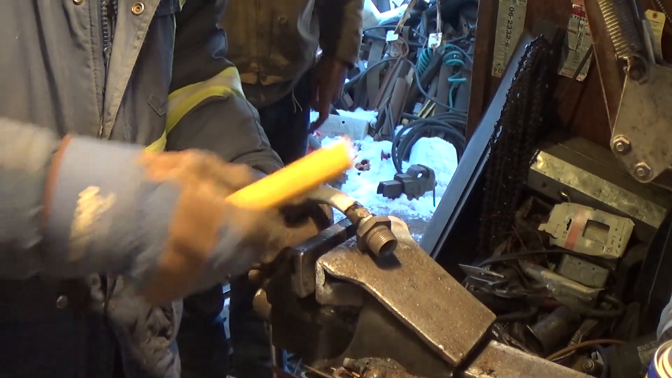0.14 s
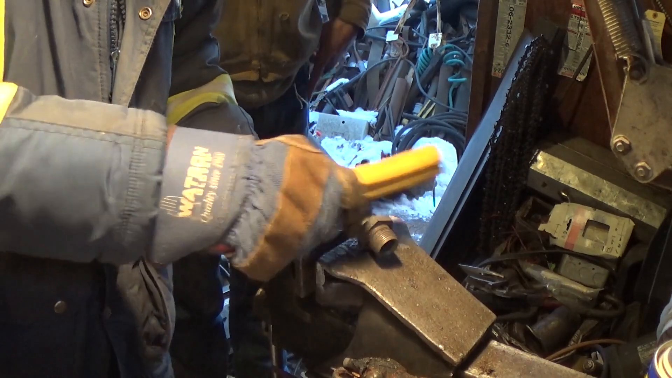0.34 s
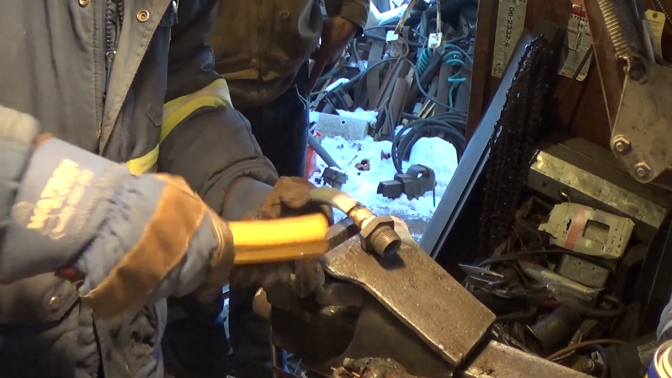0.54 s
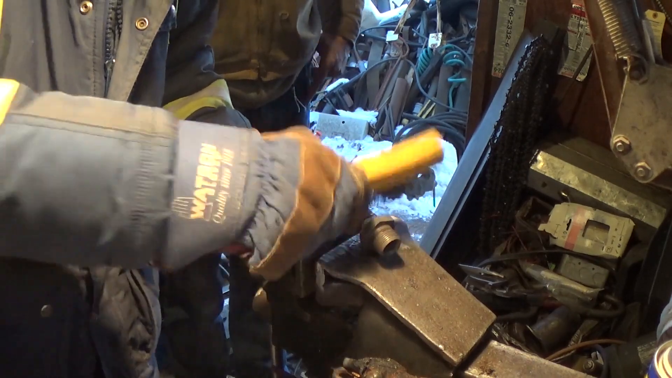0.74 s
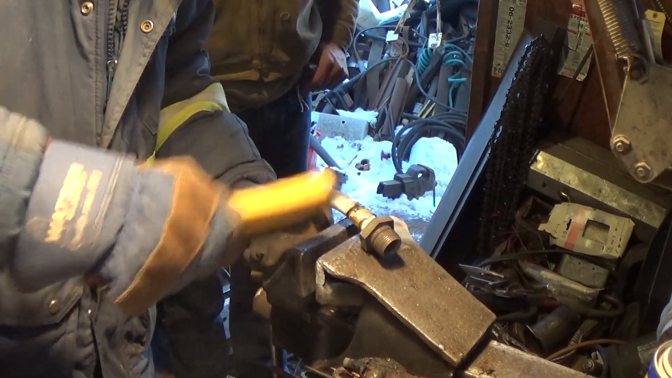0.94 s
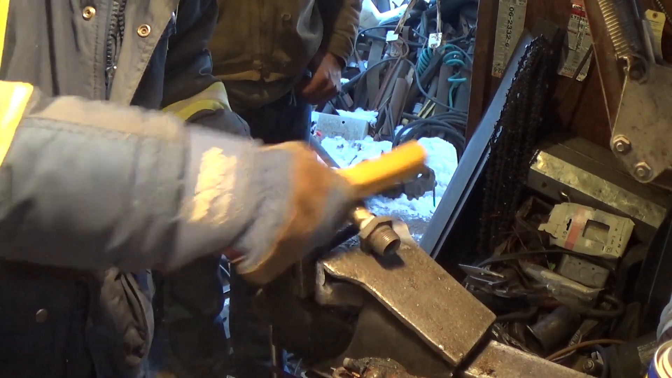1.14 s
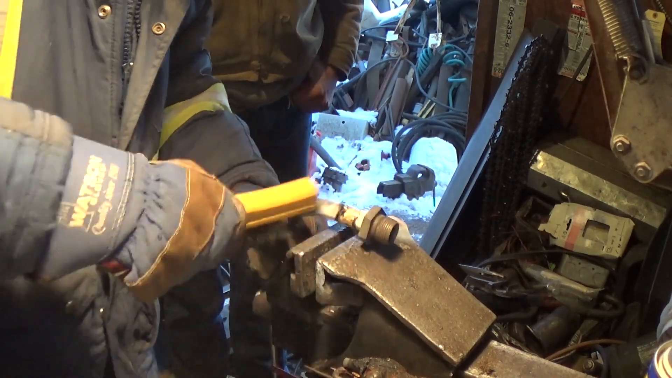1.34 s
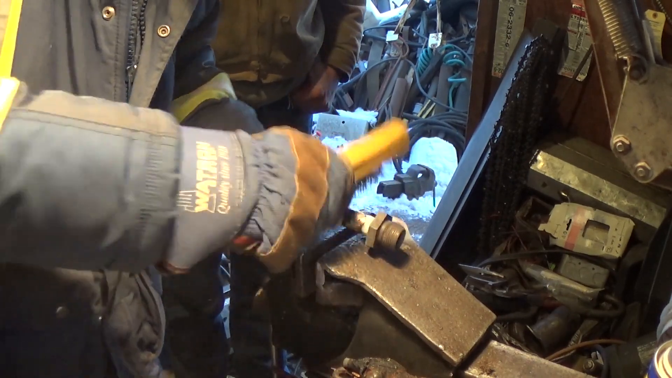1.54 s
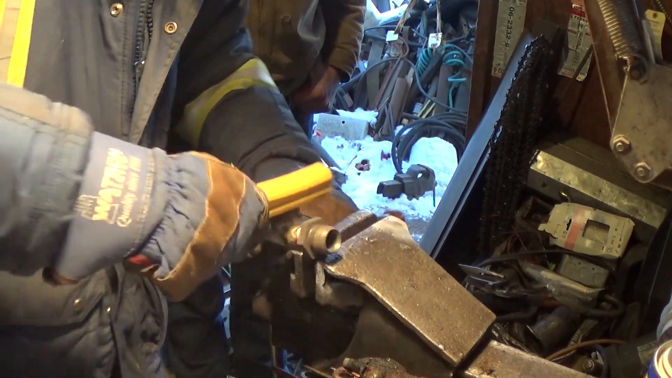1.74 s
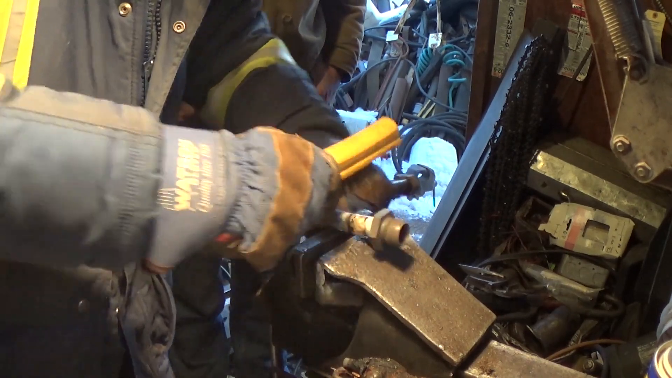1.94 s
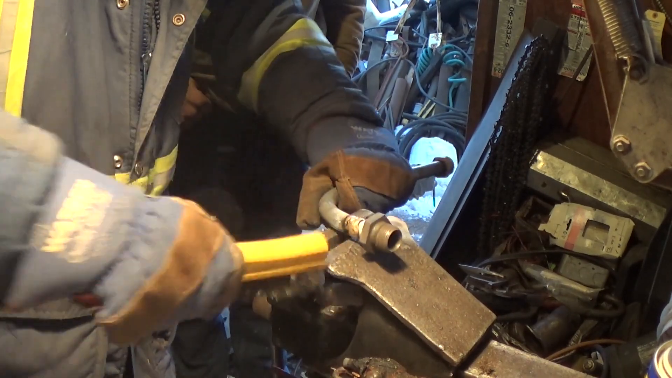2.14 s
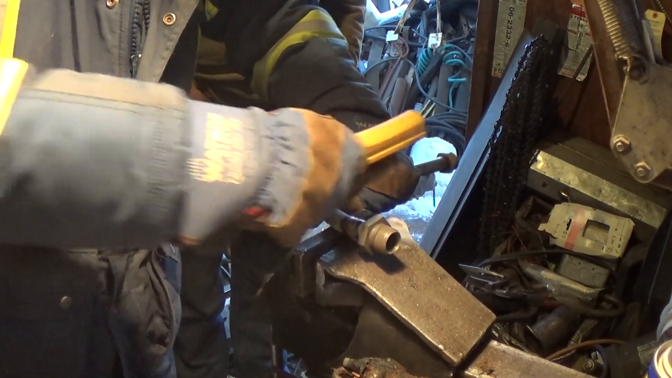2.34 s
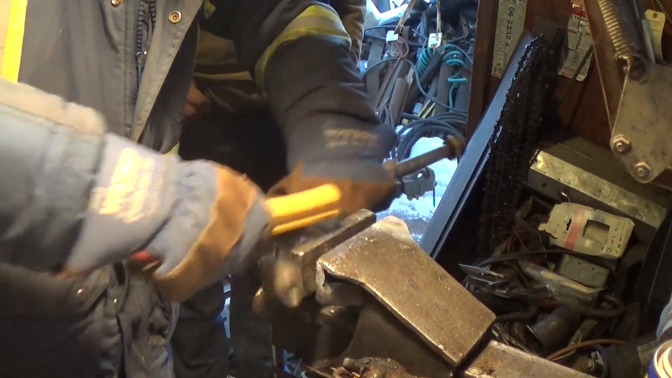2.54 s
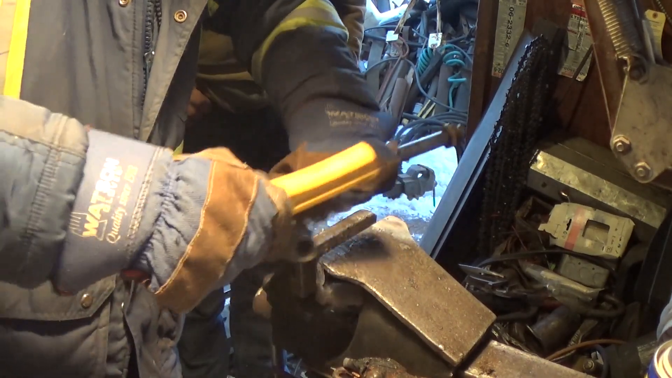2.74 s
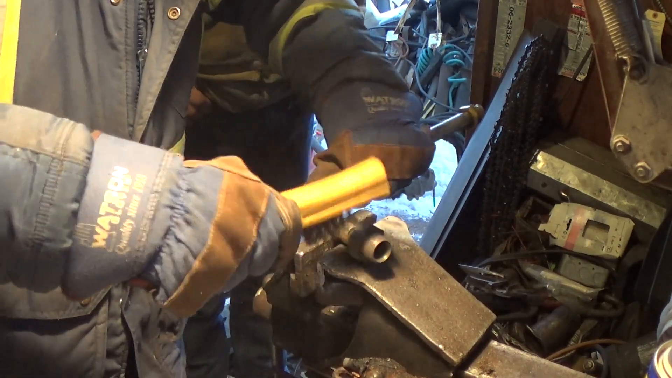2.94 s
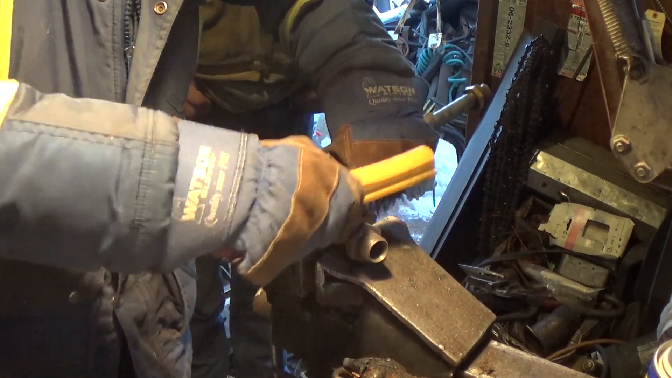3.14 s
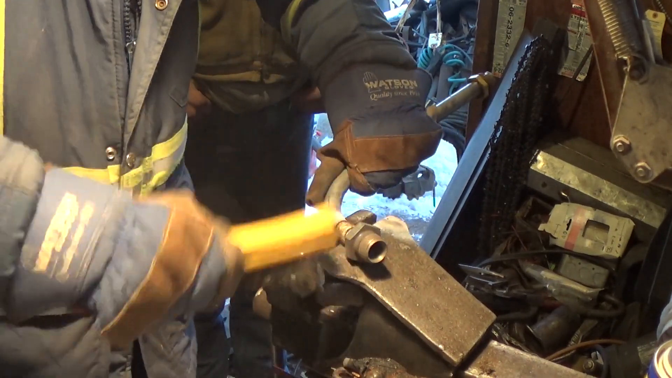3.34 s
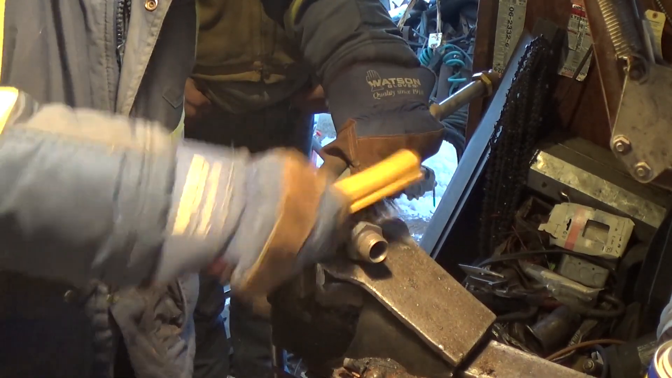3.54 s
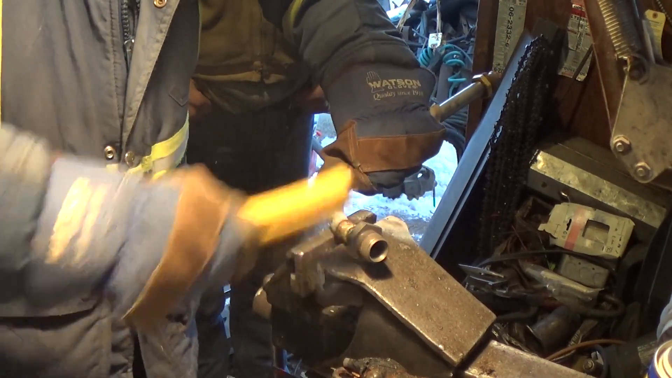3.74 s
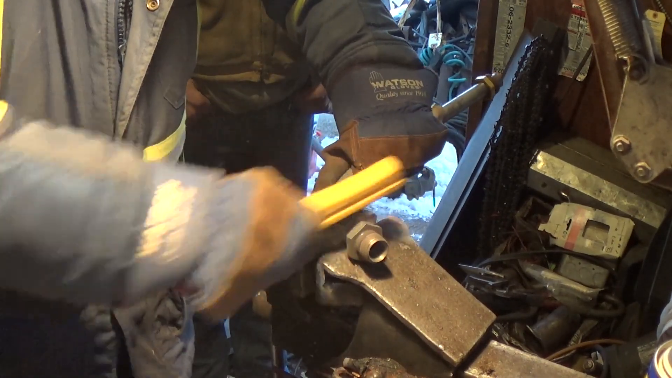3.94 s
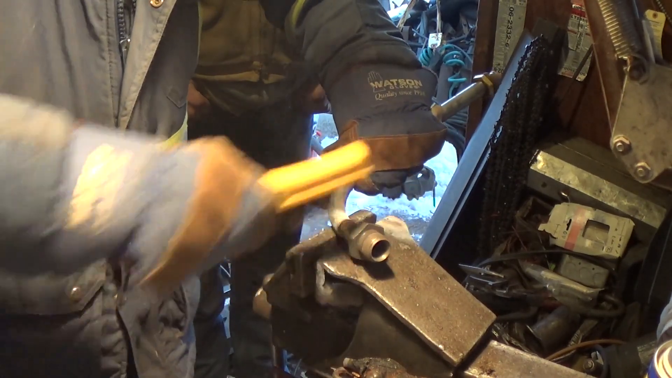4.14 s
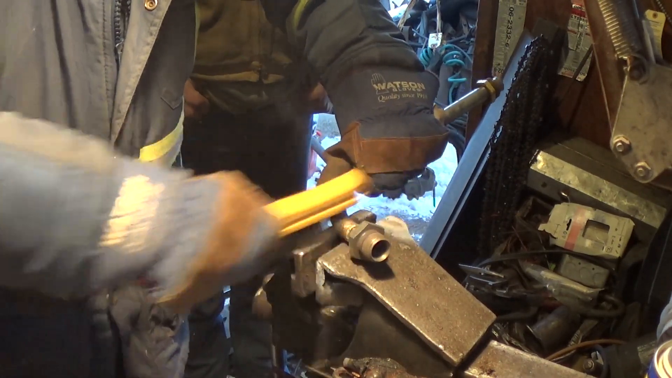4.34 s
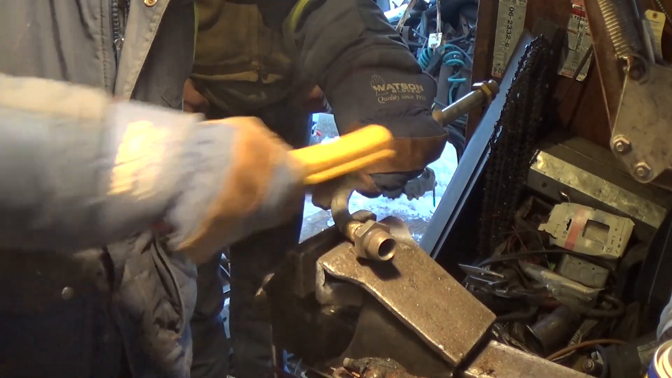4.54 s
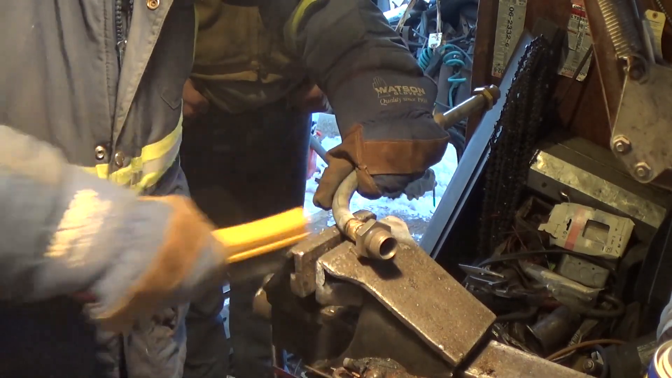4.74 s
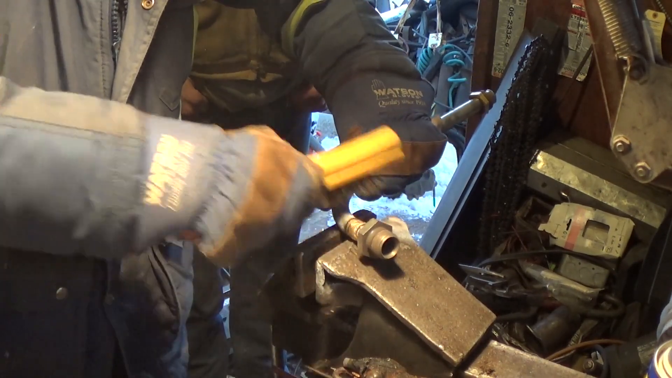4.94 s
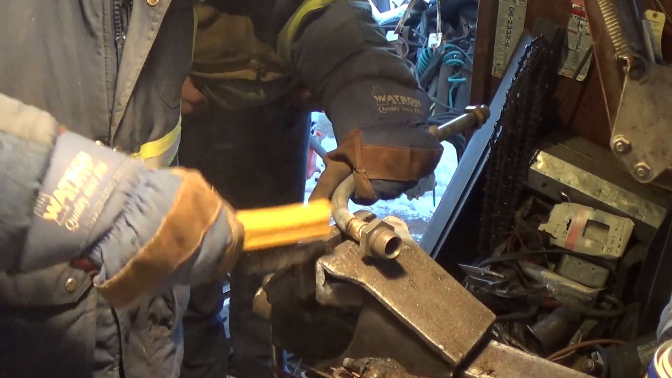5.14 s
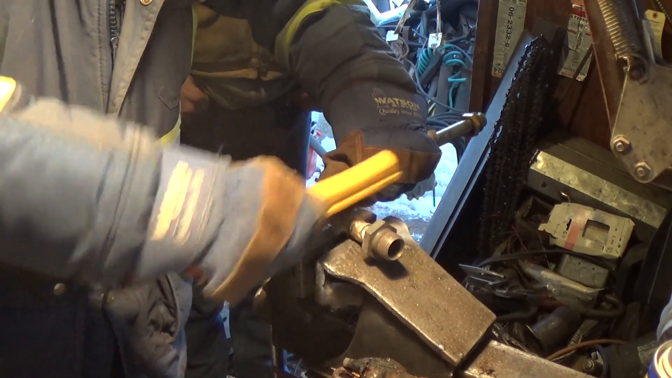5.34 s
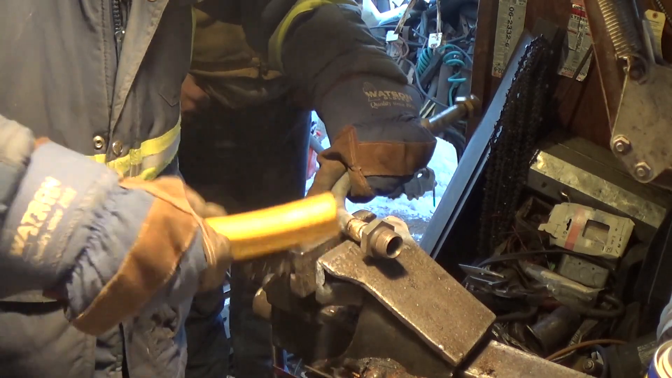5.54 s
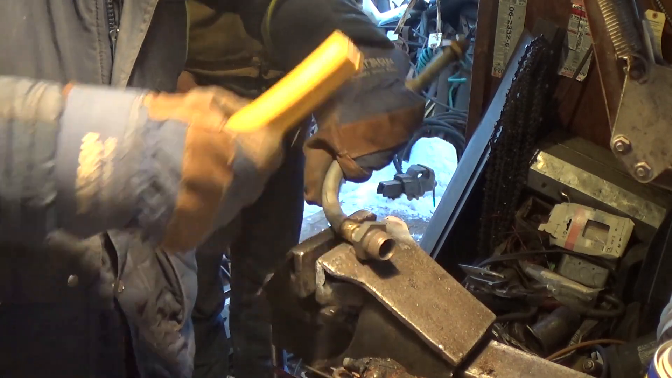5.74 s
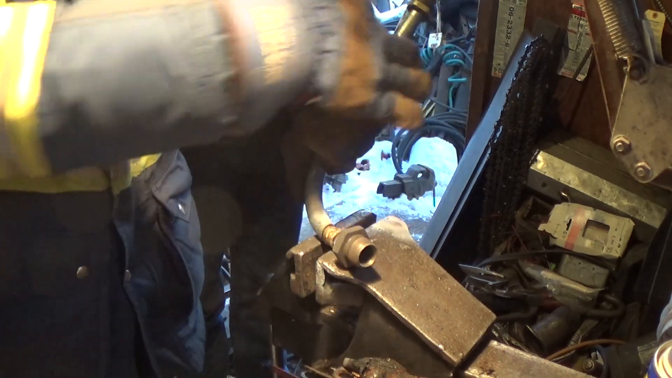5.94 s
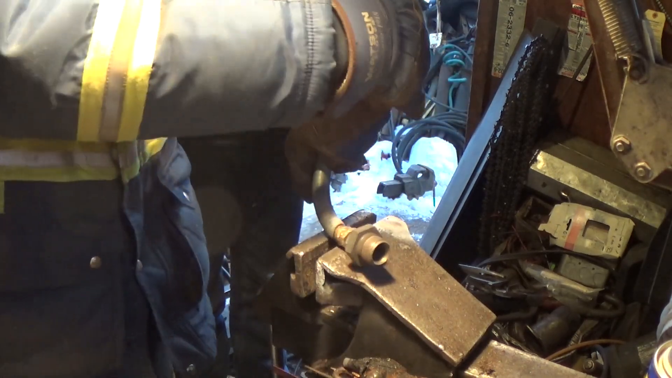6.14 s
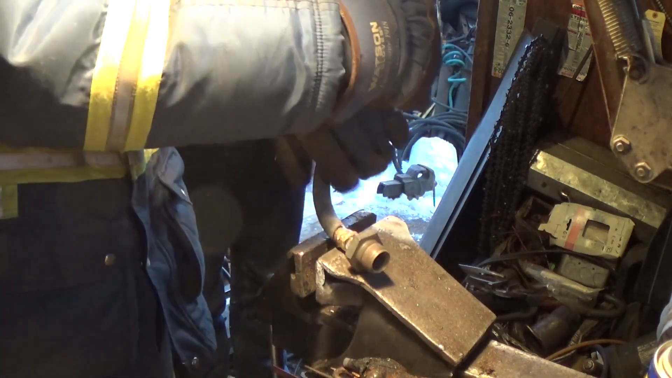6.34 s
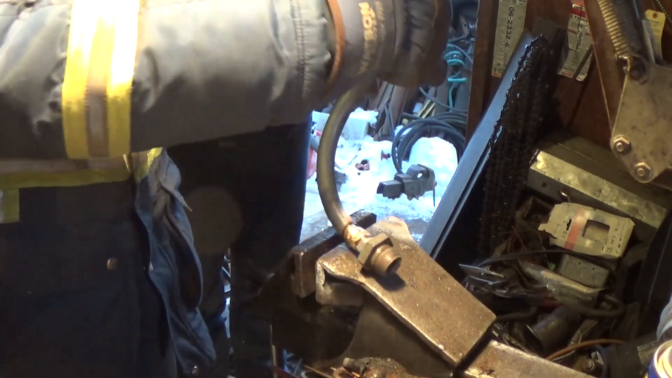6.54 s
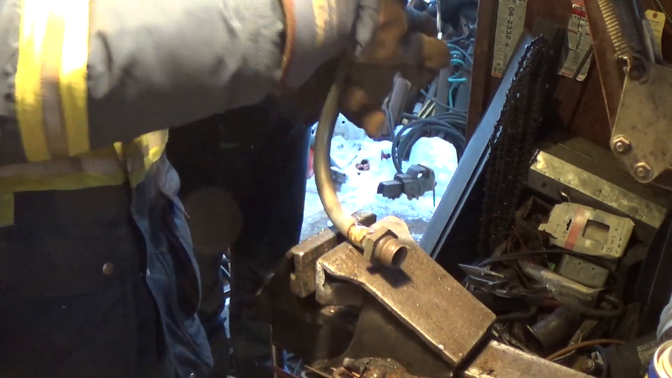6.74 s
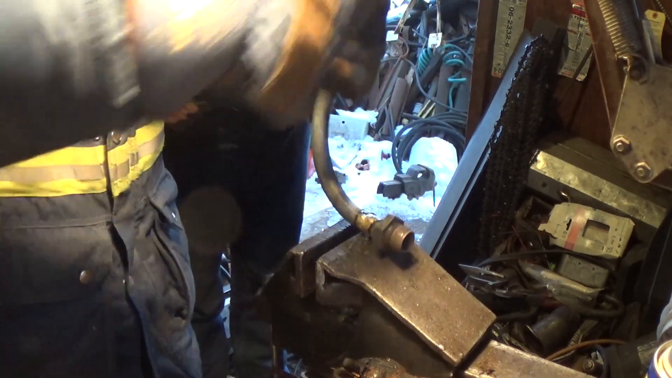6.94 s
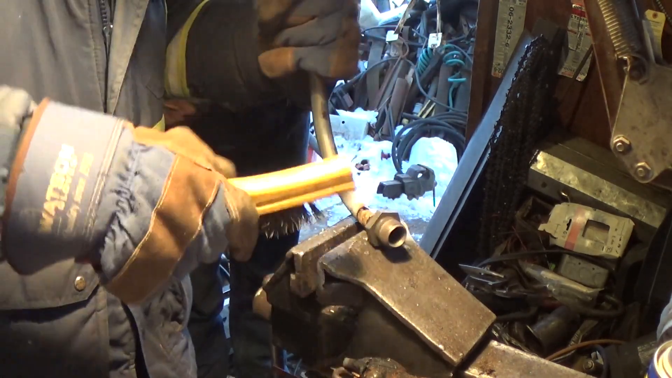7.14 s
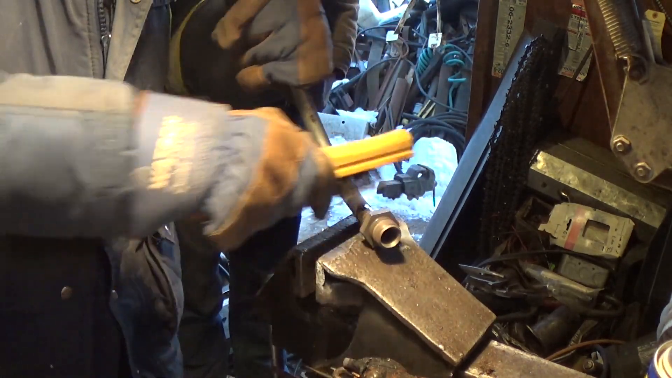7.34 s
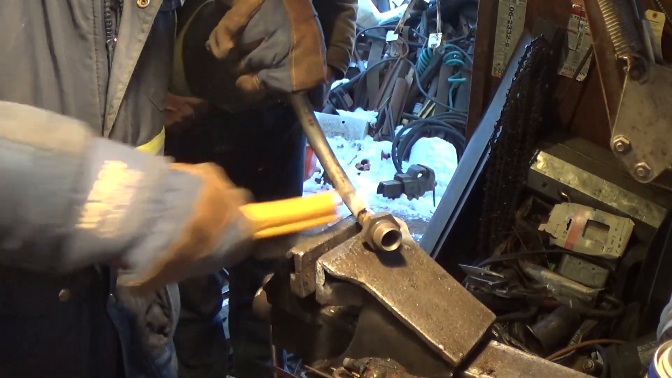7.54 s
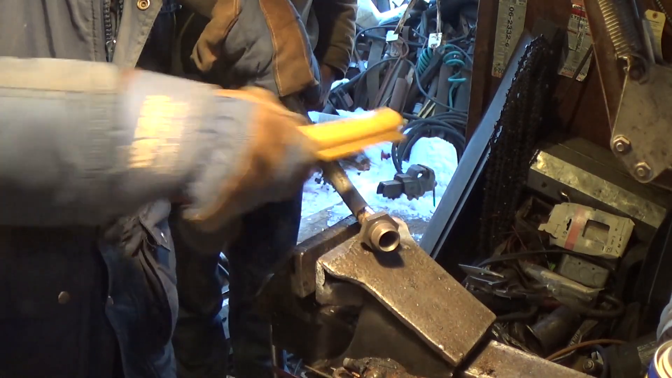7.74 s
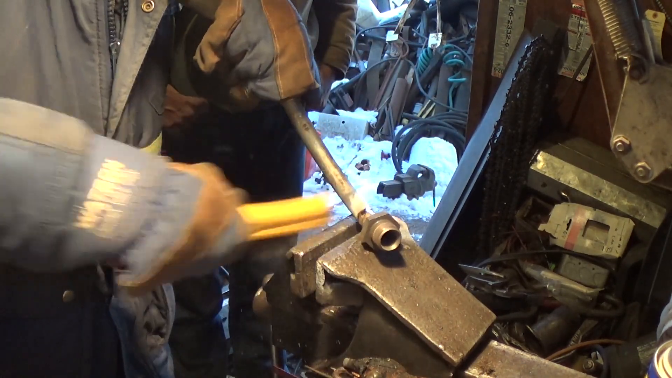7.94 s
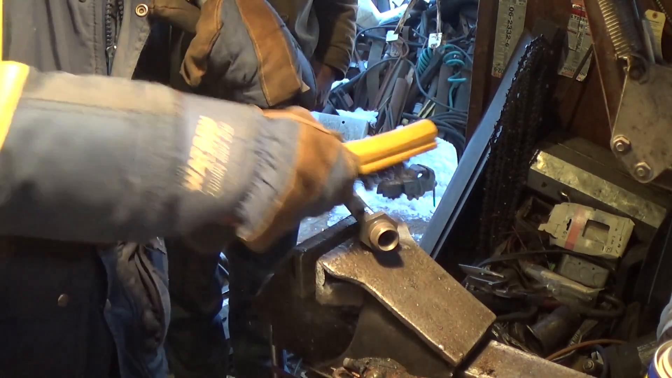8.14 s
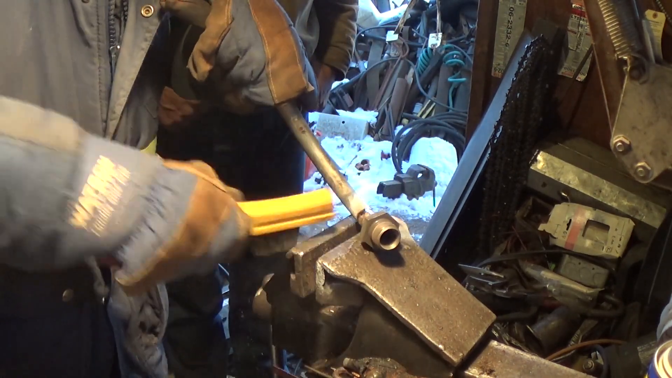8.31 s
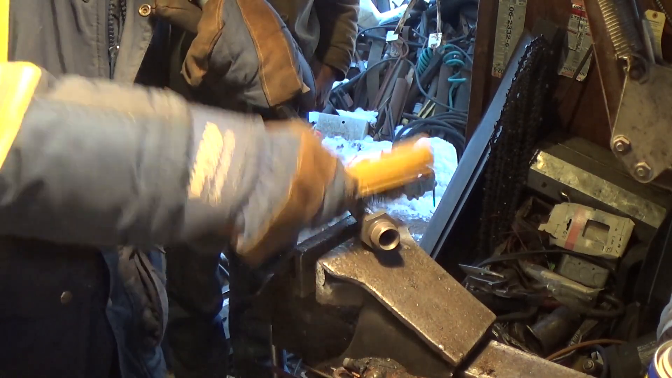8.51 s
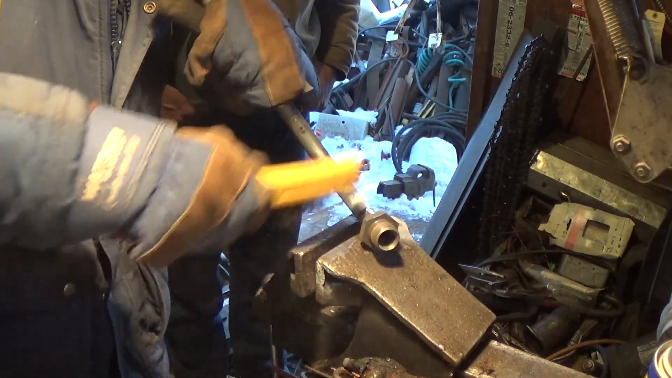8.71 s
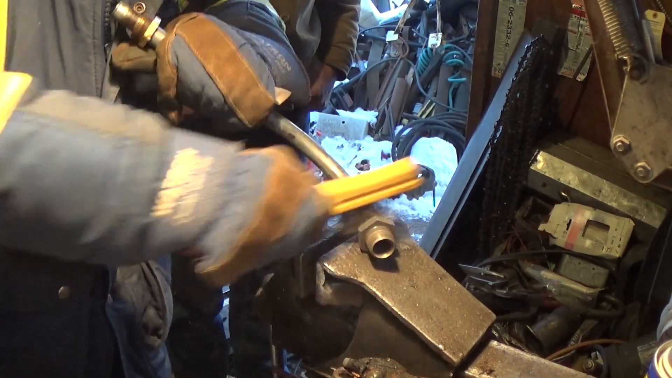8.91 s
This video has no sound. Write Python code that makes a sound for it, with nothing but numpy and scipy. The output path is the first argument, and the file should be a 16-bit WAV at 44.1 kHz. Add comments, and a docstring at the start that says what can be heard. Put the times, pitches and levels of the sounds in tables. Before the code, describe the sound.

Short bright scratches of a wire brush on metal, with clacks against a vise, a brief ringing turn of the tube, then more scratching.

```python
"""Cramped workshop, at the vise: a wire brush is pushed in short strokes over a steel fitting on a bent tube,
held by hand. Random slips of the wire tips scratch, freed wires sing as dying sines, and knocks and grinds
drive resonances of brush back, vise and gripped tube. Turned over, the loose tube rings as it drags and bumps;
jackets rustle as coloured, creasing noise. Two close microphone ports hear it all, with short room echoes."""
import sys
import numpy as np
from scipy import signal
from scipy.fft import rfft, irfft, next_fast_len
from scipy.io import wavfile

SR = 44100
rng = np.random.default_rng(int(sys.argv[2]) if len(sys.argv) > 2 else 0)


def store_wav(level_fs):
    """Save 16-bit WAV to argv[1]."""
    pcm = np.round(np.clip(np.atleast_2d(level_fs), -1, 1) * 32767)
    wavfile.write(sys.argv[1], SR, pcm.T.astype(np.int16))


N = 395577


def amp(db):
    """Gain of a level in dB."""
    return 10 ** (np.asarray(db) / 20)


def rms_one(x):
    """Scale to unit rms."""
    return x / np.sqrt(np.mean(x ** 2) + 1e-20)


def at_hz(points, hz):
    """Read a spectrum table on a log-frequency axis."""
    p = np.array(points, float)
    return np.interp(np.log(np.maximum(hz, 1)), np.log(p[:, 0]), p[:, 1])


def colour(x, spectrum):
    """Causal (minimum-phase) filter of the given spectrum, unit power gain."""
    log_gain = np.log(amp(at_hz(spectrum, np.fft.rfftfreq(4096, 1 / SR))))
    cepstrum = irfft(log_gain)
    # folding the cepstrum onto positive times makes the phase minimal
    cepstrum[1:2048] *= 2
    cepstrum[2049:] = 0
    h = irfft(np.exp(rfft(cepstrum)))
    return signal.oaconvolve(x, h / np.linalg.norm(h))[:N]


def resonances(x, modes):
    """Parallel two-pole resonances, signs alternating, unit power gain."""
    pulse = np.zeros(8192)
    pulse[0] = 1
    h = 0
    for k, (hz, width_hz, db) in enumerate(modes):
        r = np.exp(-np.pi * width_hz / SR)
        poles = [1, -2 * r * np.cos(2 * np.pi * hz / SR), r * r]
        ring = signal.lfilter([1 - r * r, 0, r * r - 1], poles, pulse)
        h = h + (-1) ** k * amp(db) * ring
    return signal.oaconvolve(x, h / np.linalg.norm(h))[:N]


def slow(rate_hz):
    """Slowly wandering chance: noise through two equal low-pass poles, rms 1."""
    r = np.exp(-2 * np.pi * rate_hz / SR)
    noise = rng.standard_normal(N + SR)
    return rms_one(signal.lfilter([1], [1, -2 * r, r * r], noise)[SR:])  # first second settles unheard


def slips(per_s, spread_db, clump_db, clump_hz):
    """Small contacts let go at random, in uneven sizes and in clumps; rms 1."""
    sizes = amp(spread_db * np.minimum(rng.exponential(1, N), 5))
    signed = sizes * rng.choice([-1, 1], N)
    happens = rng.random(N) < per_s / SR
    return rms_one(signed * happens * amp(clump_db * slow(clump_hz)))


def along(tables, fade_s):
    """Gains in time from one table per contact; silent while nothing touches."""
    t = np.arange(N) / SR
    gains = np.zeros((len(tables[0][0]) - 1, N))
    for rows in tables:
        s, *levels = np.transpose(rows)
        inside = (t >= s[0]) & (t < s[-1])
        fade = np.minimum((t[inside] - s[0]) / fade_s, 1)
        gains[:, inside] += fade * amp([np.interp(t[inside], s, db) for db in levels])
    return gains


def held(events, sag_db_per_s, end_db_per_s):
    """Each contact holds while it sags slowly, then falls away by 50 dB."""
    tables = []
    for s, hold_s, *db in events:
        sag_db = sag_db_per_s * hold_s
        tables.append([(s, *db),
                       (s + hold_s, *np.subtract(db, sag_db)),
                       (s + hold_s + 50 / end_db_per_s, *np.subtract(db, sag_db + 50))])
    return tables


def bursts(events, crest_db, t60_s, rise_s):
    """Each event is a short burst of contact per layer: quick rise, exponential fall."""
    t = np.arange(SR // 4) / SR
    gains = np.zeros((len(t60_s), N + len(t)))
    fall = np.exp(-np.log(1000) * t / np.array(t60_s)[:, None])
    shape = np.minimum(t / rise_s, 1) * fall
    for s, *levels in events:
        i = round(s * SR)
        gains[:, i:i + len(t)] += amp(np.add(levels, crest_db))[:, None] * shape
    return gains[:, :N]


def strikes(events, column):
    """One clean single-sample blow at the start of each event."""
    rows, out = np.array(events), np.zeros(N)
    out[np.round(rows[:, 0] * SR).astype(int)] = amp(rows[:, column])
    return out


def shifting(force, modes, shift_db, rate_hz):
    """The contact point wanders, so each mode is driven now harder, now softer; signs alternate."""
    shares = amp([db for hz, width_hz, db in modes]) * np.sqrt([width_hz for hz, width_hz, db in modes])
    shares = shares / np.linalg.norm(shares) * (-1) ** np.arange(len(modes))
    rings = 0
    for share, mode in zip(shares, modes):
        rings = rings + share * resonances(force * amp(shift_db * slow(rate_hz)), [mode])
    # little reaches far beyond the modes
    span = [modes[0][0], 1.4 * modes[-1][0]]
    return signal.sosfilt(signal.butter(2, span, "band", fs=SR, output="sos"), rings)


# jackets and hiss around the vise: (time [s], low rustle level [dB], high rustle level [dB]), before stirring
RUSTLE_LEVELS = [(0.0, -47, -44), (0.07, -58, -52), (0.25, -56, -46), (0.6, -59, -54.5),
                 (1.398, -56.5, -53.5), (1.8, -47, -48.5), (2.3, -58.5, -55.5), (3.0, -62.5, -58.5),
                 (3.9, -59.5, -58.5), (4.95, -58, -55), (5.219, -62.5, -60.5), (5.618, -64.5, -59.5),
                 (5.87, -50, -47), (5.98, -50, -49), (6.07, -61.5, -49.5), (6.66, -57, -58.5),
                 (7.2, -52, -54), (7.65, -69.5, -57), (7.8, -55.5, -54), (8.75, -60.5, -58.5),
                 (8.97, -54, -57)]
# cloth creasing, spectrum shape: (frequency [Hz], relative level [dB per Hz])
CREASE_SPECTRUM = [(18, -71.5), (30, -65.5), (97, -25.5), (334, -4.5), (382, -5.5), (510, -3.5), (694, -5),
                   (1170, -4), (3000, -11.5), (3900, -69), (6600, -120)]
# cloth and room hiss, spectrum shape: (frequency [Hz], relative level [dB per Hz])
HISS_SPECTRUM = [(1180, -12), (2000, -4.5), (3200, 0), (4610, -1), (6530, -1), (7060, -4), (8330, 0.5),
                 (14300, -15.5), (16000, -14.5)]
STIR_DB = 2.2   # the cloth moves unevenly


def rustle():
    """Cloth and room hiss: dense random slips, the low part sparser and coming in creases."""
    s, low_db, high_db = np.transpose(RUSTLE_LEVELS)
    t = np.arange(N) / SR
    stir = slow(15.0)
    low_gain = amp(np.interp(t, s, low_db) + STIR_DB * stir)
    high_gain = amp(np.interp(t, s, high_db) + STIR_DB / 2 * stir)
    low = colour(low_gain * slips(3000, 2.64, 3.9, 17), CREASE_SPECTRUM)
    high = colour(high_gain * slips(15000, 2.9, 1.6, 80), HISS_SPECTRUM)
    return low + high


# the brush lands and catches, brush or fitting knocks; levels before crest and mix:
# (time [s], sharp part level [dB], dull part level [dB], gripped tube ringing level [dB])
KNOCK_EVENTS = [(0.2838, -9.5, -26.5, -63), (0.3455, -31, -63, -62), (0.395, -33, -39, -59),
                (0.4214, -16, -32.5, -49), (0.498, -16, -15.5, -11), (0.5554, -29, -14, -50),
                (0.612, -16, -29.5, -16), (0.6767, -41, -34, -34), (0.7544, -44, -39.5, -64),
                (0.801, -5.5, -24.5, -27), (0.876, -3, -38, -41), (1.0271, -31.5, -65, -62),
                (1.1812, -17, -45, -68), (1.2155, -33, -37, -54), (1.2519, -7, -25, -15.5),
                (1.3355, -15, -11, -30), (1.5445, -23, -29, -20), (1.6082, -13, -40, -47),
                (1.6466, -6, -19, -17), (1.708, -17, -18, -16), (1.8267, -24, -25, -40),
                (1.928, -34, -43, -53), (1.943, -30, -43, -18), (2.0225, -5.5, -29.5, -42),
                (2.1191, -3, -41, -41), (2.1647, -21, -15, -19), (2.447, -17, -37, -52),
                (2.457, -11, -15.5, -33), (2.4904, -26, -9.5, -6), (2.5441, -20, -12.5, -40),
                (2.6154, -24, -17.5, -7), (2.682, -49, -40, -30), (2.734, -27, -43, -54),
                (2.778, -50, -44.5, -60), (2.9262, -49, -23, -32), (3.151, -24, -47, -58),
                (3.171, -23, -42, -58), (3.2062, -33, -40.5, -58), (3.238, -17, -54, -47),
                (3.328, -0.5, -43, -53), (3.5874, -12, -31, -61), (3.6196, -12, -40, -49),
                (3.69, -5, -20, -41), (3.7115, -14, -20, -38), (3.9536, -11, -34.5, -18),
                (4.0398, -11, -20, -36), (4.0664, -24, -13.5, -23), (4.0878, -22, -45, -34),
                (4.3156, -7, -26, -42), (4.355, -14, -30.5, -35), (4.4584, -8.5, -13.5, -48),
                (4.6719, -5, -22, -14.5), (4.785, -21, -17, -45), (5.022, -10, -24, -15.5),
                (5.3747, -7.5, -29.5, -19.5), (5.511, -10.5, -43, -55), (5.531, -20, -47, -55),
                (5.6594, -36.5, -41.5, -62), (6.0274, -39, -40, -68), (6.1125, -3.5, -42, -7.5),
                (6.1394, -23, -20, -39), (7.362, -37, -45.5, -37), (7.4899, -7.5, -33, -15.5),
                (7.5597, -3, -17.5, -46), (7.7855, -29, -49, -61), (7.853, -29, -60, -55),
                (7.8644, -3.5, -32, -13), (7.9093, -18, -23, -41), (8.1256, -26.5, -41.5, -63),
                (8.2188, -12, -32, -4.5), (8.2894, -10, -47, -42), (8.449, -26, -63, -66),
                (8.5546, -1.5, -25.5, -18), (8.62, -13, -36, -45), (8.8802, -14, -38, -54),
                (8.894, -16, -50, -50)]
# brush back or fitting grinds on the vise; levels at its start, before mix:
# (time [s], hold length [s], rumble level [dB], gripped tube ringing level [dB])
GRIND_EVENTS = [(0.496, 0.016, -23, -29), (0.876, .02, -20.5, -20.5), (1.19, 0.067, -38, -58),
                (1.24, 0.016, -26, -39), (1.325, 0.033, -20.5, -14), (1.54, 0.017, -30.5, -18.5),
                (1.647, 0.088, -18.5, -15), (1.76, 0.027, -55, -29), (1.81, 0.081, -34, -51),
                (1.925, 0.036, -27.5, -41), (2.165, 0.013, -28, -22), (2.456, 0.11, -19, -23),
                (2.616, 0.017, -29.5, -26), (2.927, 0.016, -22.5, -33), (3.31, 0.028, -23, -59),
                (3.713, 0.01, -30, -45), (4.066, 0.019, -18, -26), (4.46, .01, -38, -46),
                (4.786, 0.012, -23, -37), (6.005, 0.014, -40, -42), (8.22, 0.0067, -57, -29),
                (8.27, 0.011, -33.5, -33)]
GRIND_SAG_DB_PER_S, GRIND_END_DB_PER_S = 29.5, 502.5
BODY_UNDER_DB = 24.5   # how far below the wires the brush back is driven by their pressure


def brush_contacts():
    """Driving gains of wires, body and gripped tube: strokes, grinds and knocks add in power."""
    knocks = bursts(KNOCK_EVENTS, crest_db=[-9., 1.5, 3.], t60_s=[.035, .055, .03], rise_s=0.0018)
    press = stroke_pressure()
    grinds = held(GRIND_EVENTS, GRIND_SAG_DB_PER_S, GRIND_END_DB_PER_S)
    grind, grind_ring = along(grinds, fade_s=0.0021)
    body = np.hypot(grind, press * amp(-BODY_UNDER_DB))
    return np.hypot([press, body, grind_ring], knocks)


# brush strokes, the faint ones on the way back; wire levels before mix:
# (time [s], swell length [s], sag length [s], level at landing [dB], level at full pressure [dB])
STROKE_EVENTS = [(0.29, 0.015, 0.042, -26, -34.5), (0.39, 0.11, .07, -33, -21),
                 (0.8, 0.089, 0.065, -35.5, -19.5), (1.176, 0.037, 0.041, -38, -44),
                 (1.256, 0.069, 0.025, -36, -20.5), (1.54, 0.017, 0.01, -45, -26.5),
                 (1.65, 0.03, 0.056, -23, -23.5), (1.928, .02, 0.016, -47, -36),
                 (2.022, 0.11, .045, -41, -19.5), (2.29, .02, .08, -62, -54.5),
                 (2.458, 0.058, 0.081, -46, -21.5), (2.616, 0.0081, 0.013, -37, -33),
                 (2.93, 0.022, 0.037, -59, -44.5), (3.152, 0.15, 0.028, -52, -19),
                 (3.586, 0.087, 0.041, -35, -19.5), (3.82, 0.036, 0.029, -62, -51.5),
                 (3.953, 0.083, 0.037, -33.5, -19.5), (4.32, 0.075, 0.064, -34, -21),
                 (4.671, 0.088, 0.09, -36, -20), (5.022, 0.071, 0.12, -33.5, -23),
                 (5.378, 0.082, 0.061, -29.5, -24), (5.67, 0.012, 0.032, -52, -55),
                 (7.493, 0.058, .075, -35, -22), (7.76, .04, .03, -55, -57),
                 (7.867, 0.064, 0.08, -37, -22.5), (8.123, .015, 0.037, -46, -47),
                 (8.218, 0.066, .075, -31, -22.5), (8.45, 0.034, .015, -42, -44),
                 (8.553, 0.067, 0.075, -33.5, -22.5), (8.81, 0.02, 0.0046, -60, -41.5),
                 (8.878, 0.093, 0.039, -44, -23.5)]
SAG_DB_PER_S, LIFT_DB_PER_S = 119, 957   # after full pressure; as the brush leaves
SWELL_HALF = 0.42   # share of the swell in dB reached at half its time


def stroke_pressure():
    """Each stroke lands, swells to full pressure, sags and lifts off."""
    tables = []
    for s, swell_s, sag_s, land_db, full_db in STROKE_EVENTS:
        after, = held([(s + swell_s, sag_s, full_db)], SAG_DB_PER_S, LIFT_DB_PER_S)
        halfway = (s + swell_s / 2, land_db + SWELL_HALF * (full_db - land_db))
        tables.append([(s, land_db), halfway] + after)
    return along(tables, fade_s=0.0096)[0]


# scratching wire tips, spectrum shape: (frequency [Hz], relative level [dB per Hz])
WIRE_SPECTRUM = [(180, -56.5), (300, -15.5), (572, -15.5), (1070, -18.5), (1540, -9.5), (1730, -8.5),
                 (2940, -14), (3640, -3.5), (5150, -6), (6390, 2.5), (8050, -5.5), (9820, 0),
                 (13400, -14.5), (15600, -23)]
# wire tufts ring briefly as they slip: (frequency [Hz], width [Hz], relative level [dB])
TUFT_MODES = [(3590, 190, -6), (5510, 350, -7), (6240, 128, -29.5), (6050, 900, 19), (8610, 510, -25),
              (9470, 710, 31), (10400, 320, 26.5), (12740, 330, -38.5)]


def wire_scratch(wires):
    """Wire tips slip in clumps as coloured noise, and their tufts ring briefly."""
    tips = colour(wires * slips(8000, 3.2, 2.3, 90), WIRE_SPECTRUM)
    tufts = amp(-6.5) * resonances(wires * slips(2500, 3.5, 2.8, 60), TUFT_MODES)
    return patchy(tips + tufts, patchy_db=2.0, rate_hz=30.)


# brush angle: (time [s], extra treble level above 12 kHz [dB])
ANGLE_SHEEN = [(0, 4), (1.5, 0), (2.6, 0), (3.5, 1), (4.702, 4.5), (5.5, 5), (7.6, 8), (8.97, 5.5)]


def patchy(x, patchy_db, rate_hz):
    """Tufts of wire touch in turn, so each band of the scratch swells on its own."""
    edges = np.geomspace(150, 17000, 15)
    s, sheen_db = np.transpose(ANGLE_SHEEN)
    sheen = np.interp(np.arange(N) / SR, s, sheen_db)
    out = 0
    for k, (low, high) in enumerate(zip(edges, edges[1:])):
        band = signal.sosfilt(signal.butter(2, [low, high], "band", fs=SR, output="sos"), x)
        lift = sheen * (high > 13000)   # only the top band
        out = out + (-1) ** k * band * amp(patchy_db * slow(rate_hz) + lift)
    return out


# brush back and vise: (frequency [Hz], width [Hz], relative level [dB])
BODY_MODES = [(185.4, 59, -18), (322, 123, -21), (457.4, 53, -6), (607, 240, -9.5), (893, 122, -6),
              (1201, 90, -3.5), (1343, 96, -1), (1569, 180, -4), (1878, 145, -4.5), (2160, 730, -9.5),
              (3200, 440, -6.5), (3720, 470, -8)]


def body_rumble(body):
    """Slips and clean dull blows shake the broad modes of brush back and vise."""
    force = body * slips(2500, 3.3, 2.5, 40) + amp(11) * strikes(KNOCK_EVENTS, column=2)
    return shifting(force, BODY_MODES, shift_db=1.8, rate_hz=8.)


# steel tube and fitting, ringing freely: (frequency [Hz], width [Hz], relative level [dB])
TUBE_MODES = [(480, 40, -20), (620, 50, -24), (850, 40, -24), (1110, 32, -14), (1260, 30, -20),
              (1500, 60, -24), (1960, 24, -12), (2290, 30, -19), (2675, 14, -9), (3125, 30, -7),
              (3280, 40, -15), (4389, 20, 0), (4479, 16, -4), (4520, 30, -9), (6400, 30, -12),
              (6462, 26, -3), (7168, 12, -18), (8565, 15, -16), (8652, 20, -14), (10300, 60, -19),
              (10500, 60, -19), (10775, 25, -16), (11150, 60, -22), (11800, 50, -25), (12150, 40, -24),
              (12400, 30, -24), (13070, 30, -29), (14000, 30, -30), (14380, 30, -33), (15220, 40, -30)]
SOFT_TOP_HZ = 2400   # splits the tube's low modes, for soft contacts, from its high ones
GRIP_DAMPING = 4.5   # a gloved grip widens the modes this many times


def gripped_tube(ring):
    """The hand damps the tube, so its high modes ring wide and short."""
    modes = [(hz, width_hz * GRIP_DAMPING, db) for hz, width_hz, db in TUBE_MODES if hz > SOFT_TOP_HZ]
    return resonances(ring * slips(5000, 3.0, 2.5, 60), modes)


def arm_push(wires):
    """The push of the arm: noise with the gain of the wires through two low resonances."""
    return resonances(wires * rng.standard_normal(N), [(118, 24, 1.0), (190, 120, -4.0)])


def brush():
    """Scratching wires, rumbling body, damped tube and the push of the arm share the same contacts."""
    wires, body, ring = brush_contacts()
    scratch = amp(-5.0) * wire_scratch(wires)
    rumble = body_rumble(body)
    ringing = amp(-8.0) * gripped_tube(ring)
    return scratch + rumble + ringing + amp(-38.0) * arm_push(wires)


# single wires spring free and sing: (time [s], frequency [Hz], starting level [dB], time to fall 60 dB [s])
PING_EVENTS = [(1.31, 11650, -36, 0.39), (1.405, 12200, -43, .3), (1.405, 11300, -42, .12),
               (5.677, 9100, -43, 0.11), (5.677, 11060, -42.5, 0.19), (6.19, 12400, -51, .15),
               (7.49, 11690, -27, 0.14), (7.865, 11300, -23, 0.13), (8.22, 11690, -28, .12)]


def pings():
    """Each freed wire is one dying sine."""
    out, t = np.zeros(N + SR), np.arange(SR // 2) / SR
    for s, hz, db, t60_s in PING_EVENTS:
        i = round(s * SR)
        fall = np.exp(-np.log(1000) * t / t60_s)
        out[i:i + len(t)] += amp(db) * np.sin(2 * np.pi * hz * t) * fall
    return out[:N]


# the loose tube is dragged over the vise jaw; levels at its start, before mix:
# (time [s], hold length [s], high modes level [dB], low modes level [dB])
DRAG_EVENTS = [(6.115, 0.013, -28.5, -41), (6.66, .03, -64, -46.5), (6.775, 0.068, -22.5, -42),
               (6.907, 0.021, -26.5, -43), (6.956, 0.013, -29.5, -36.5), (6.982, 0.098, -26, -36.5)]
# the loose tube bumps the vise; before crest and mix: (time [s], high modes level [dB], low modes level [dB])
BUMP_EVENTS = [(6.1146, -15.5, -52), (6.1401, -43, -30.5), (6.2979, -62, -55), (6.4255, -48, -46),
               (6.4694, -49, -40.5), (6.5244, -63, -33), (6.573, -64, -47), (6.664, -59, -50),
               (6.6776, -39, -57), (6.766, -30, -33.5), (6.779, -12, -29), (6.8269, -8.5, -39),
               (6.8433, -27, -54), (6.9063, -6, -48), (6.9574, -30, -25), (6.9844, -14, -25),
               (7.0726, -17.5, -32), (7.1854, -53, -36), (7.2035, -73, -62)]
DRAG_SAG_DB_PER_S, DRAG_END_DB_PER_S = 67, 398


def tube():
    """The loose tube rings freely: hard contacts sound the high modes, soft ones the low."""
    bumps = bursts(BUMP_EVENTS, crest_db=[-4., 4.5], t60_s=[.012, .025], rise_s=0.0006)
    drags = along(held(DRAG_EVENTS, DRAG_SAG_DB_PER_S, DRAG_END_DB_PER_S), fade_s=0.0017)
    hard, soft = np.hypot(drags, bumps)
    blows = strikes(BUMP_EVENTS, column=1)
    high_modes = [mode for mode in TUBE_MODES if mode[0] > SOFT_TOP_HZ]
    low_modes = [mode for mode in TUBE_MODES if mode[0] < SOFT_TOP_HZ]
    hard_force = hard * slips(6000, 1.5, 3.0, 60) + amp(17.5) * blows
    high = shifting(hard_force, high_modes, shift_db=3., rate_hz=6.)
    soft_force = soft * slips(3000, 2.1, 3.3, 42)
    low = shifting(soft_force, low_modes, shift_db=3., rate_hz=8.)
    # the jaw's own crack and scrape
    scrape = amp(-12.5) * hard * rng.standard_normal(N)
    crack = colour(amp(-26) * blows + scrape, WIRE_SPECTRUM)
    return high + low + crack + amp(-9) * resonances(soft_force, BODY_MODES)


# the cramped room: (frequency [Hz], room over direct level [dB])
ROOM_ECHO = [(60, -24), (250, -20), (1000, -13), (3000, -13), (8000, -17), (15000, -24)]
ROOM_T60_S = .28


def workshop(x):
    """Dense dying echoes, different at each microphone port."""
    t = np.arange(SR // 2) / SR
    fall = np.exp(-np.log(1000) * t / ROOM_T60_S) * (t > .002)   # starts 2 ms after the direct sound
    tails = rng.standard_normal((2, len(t))) * fall
    tails /= np.linalg.norm(tails, axis=1, keepdims=True)
    size = next_fast_len(N + len(t))
    tint = amp(at_hz(ROOM_ECHO, np.fft.rfftfreq(size, 1 / SR)))
    return irfft(rfft(x, size) * rfft(tails, size) * tint, size)[:, :N]


# direct sound at the two ports: (frequency [Hz], left over right level [dB])
PORT_LEVEL = [(60, -0.5), (110, 0.0), (200, -0.5), (380, -0.5), (700, -0.5), (1290, -0.5), (2380, -0.5),
              (4400, -0.5), (8120, 0.0), (15000, 0.0)]
# direct sound at the two ports: (frequency [Hz], phase by which left leads [rad])
PORT_LEAD = [(0, -0.21), (1380, -0.53), (4480, -0.3), (16200, 0.042)]


def scene():
    """The direct sound reaches two close ports with a small level and phase offset; the room adds echoes."""
    x = brush() + tube() + pings() + rustle()
    size = next_fast_len(N + 2048)
    hz = np.fft.rfftfreq(size, 1 / SR)
    lead = np.interp(hz, *np.transpose(PORT_LEAD))
    half = amp(at_hz(PORT_LEVEL, hz) / 2) * np.exp(.5j * lead)   # half the offset on each side
    direct = irfft(rfft(x, size) * [half, 1 / half], size)[:, :N]
    return direct + workshop(x)


CUTOFF_HZ = 15900   # the top is 50 dB down from here


def record(dry):
    """The microphone drops the deep bass, peaks are rounded, the top is cut."""
    thin = signal.sosfilt(signal.butter(2, 95, "high", fs=SR, output="sos"), dry)
    # the amplifier's own low noise
    noise = signal.lfilter([.1], [1, -.99], rng.standard_normal(dry.shape))
    rounded = .9 * np.tanh((thin + amp(-87.5) * noise) / .9)
    return signal.sosfilt(signal.cheby2(20, 50, CUTOFF_HZ, fs=SR, output="sos"), rounded)


dry = scene()
out = record(dry)
store_wav(out)
```